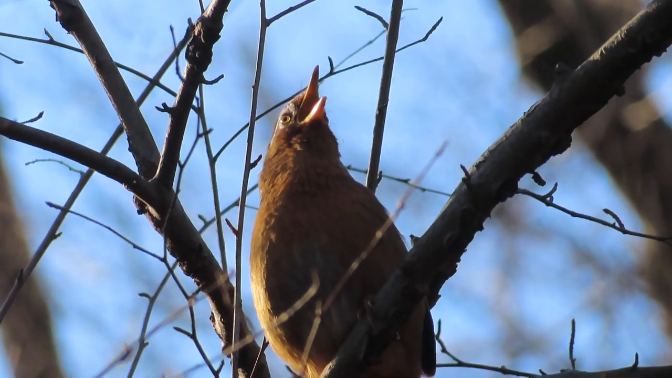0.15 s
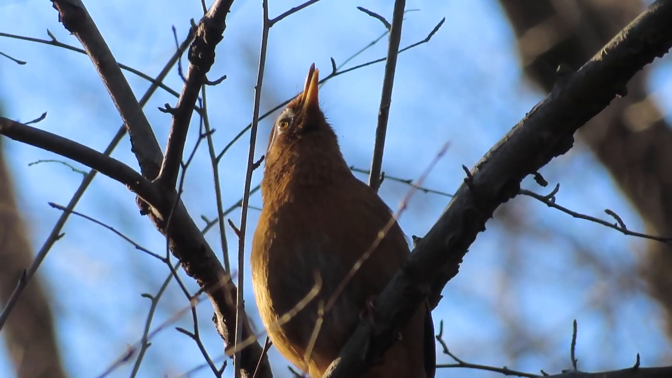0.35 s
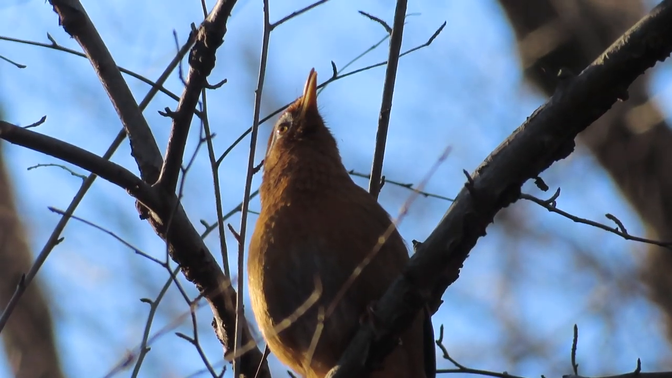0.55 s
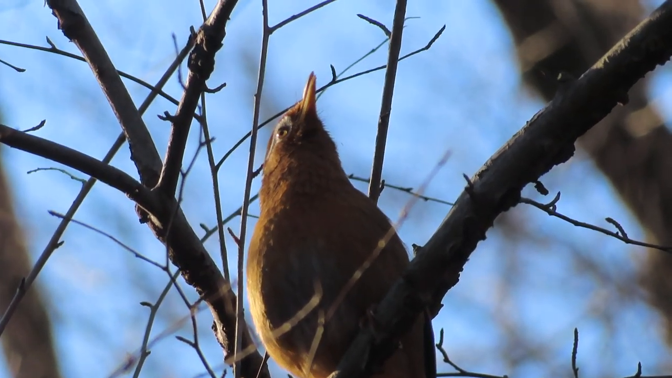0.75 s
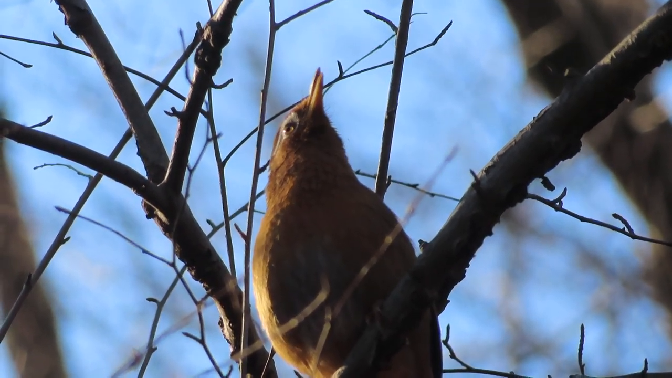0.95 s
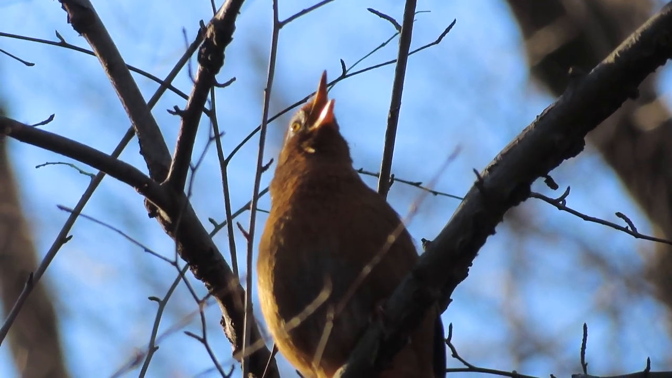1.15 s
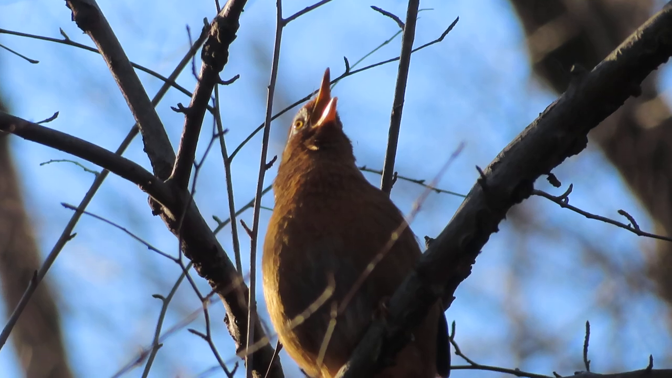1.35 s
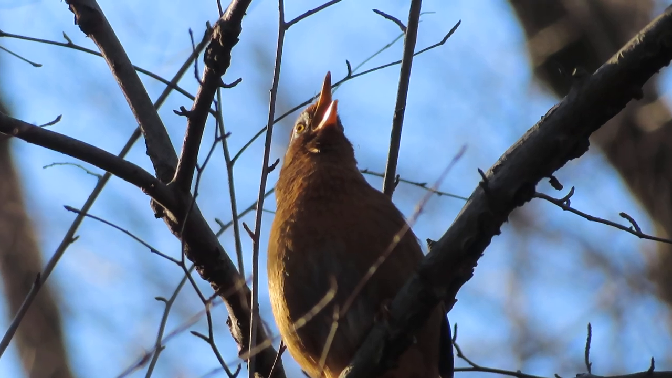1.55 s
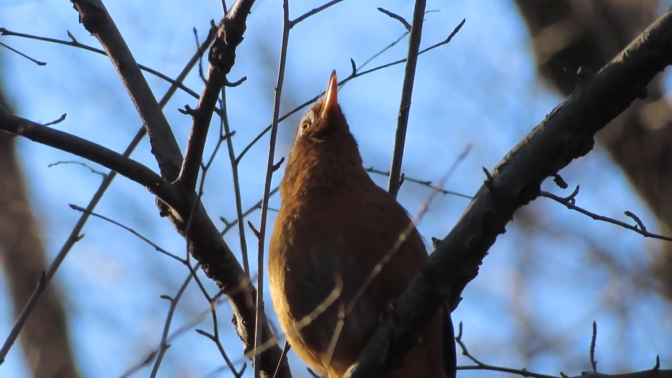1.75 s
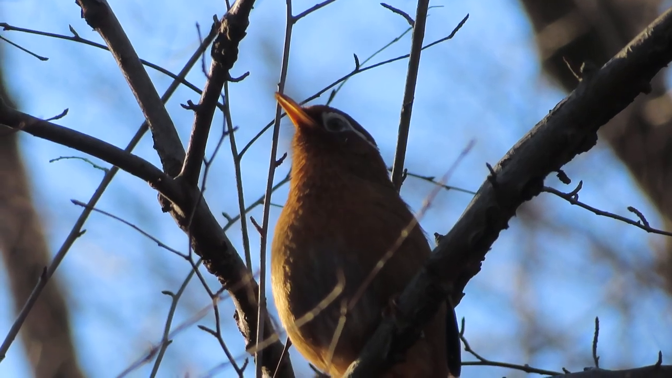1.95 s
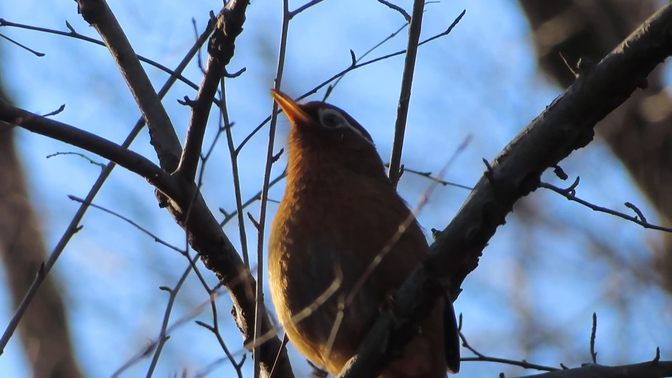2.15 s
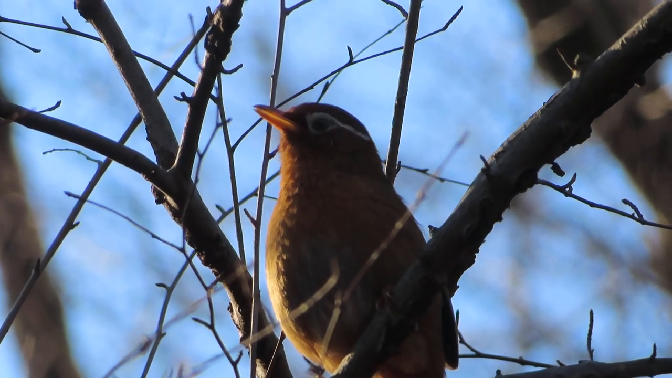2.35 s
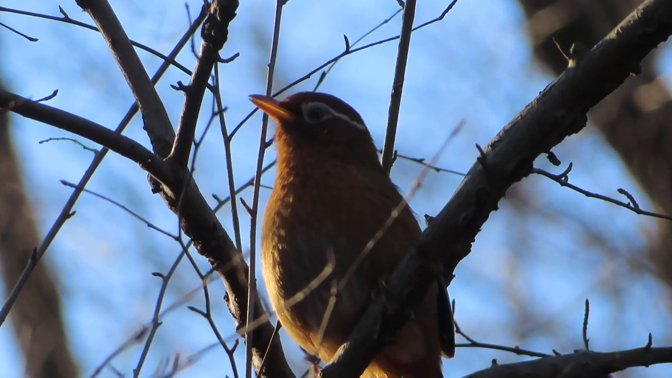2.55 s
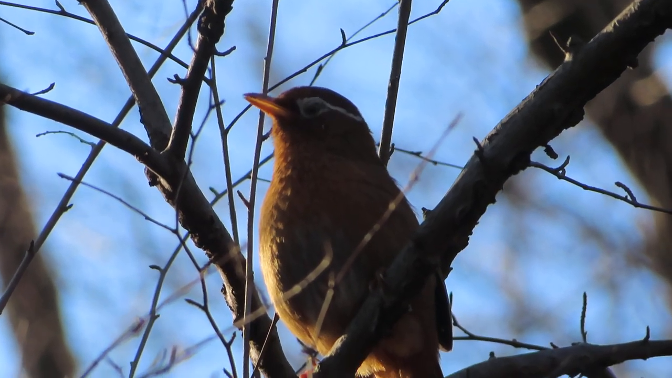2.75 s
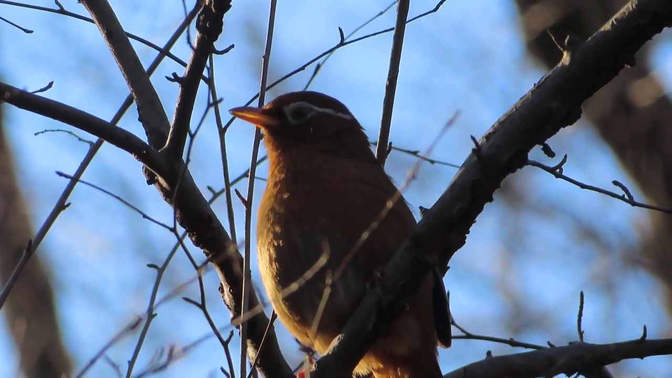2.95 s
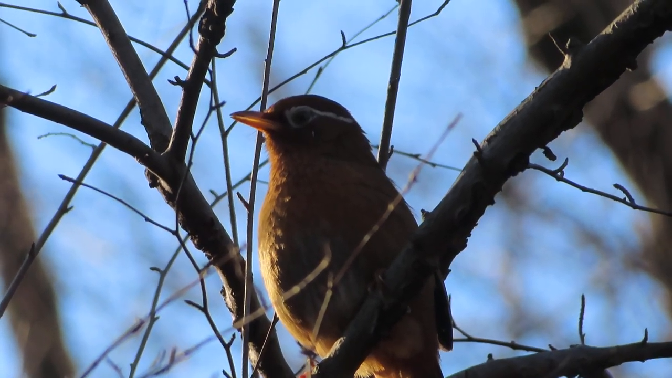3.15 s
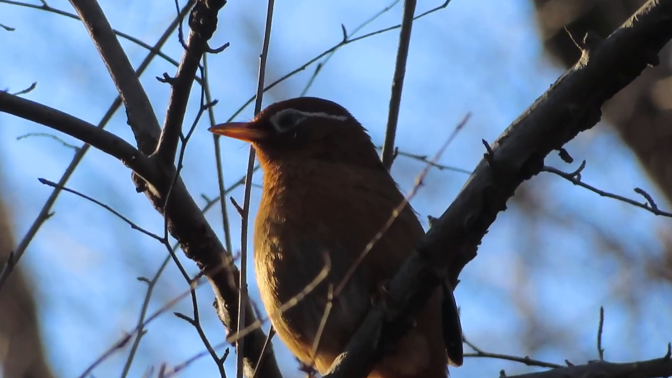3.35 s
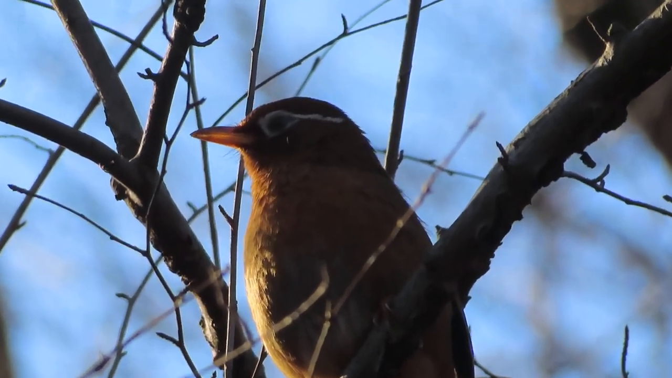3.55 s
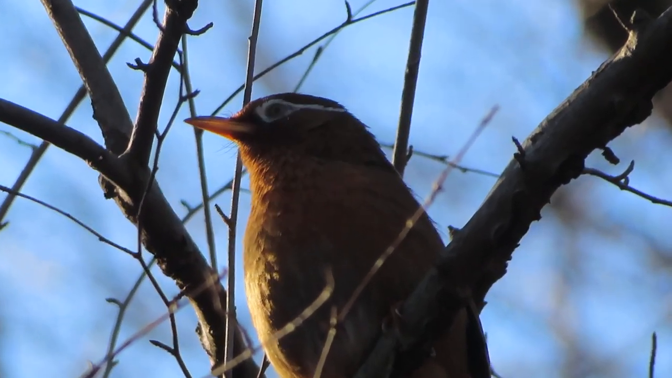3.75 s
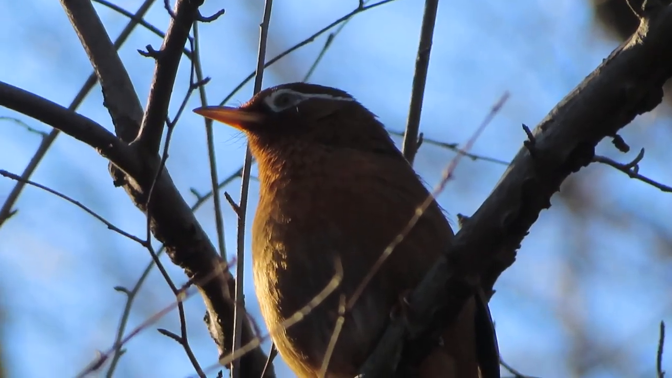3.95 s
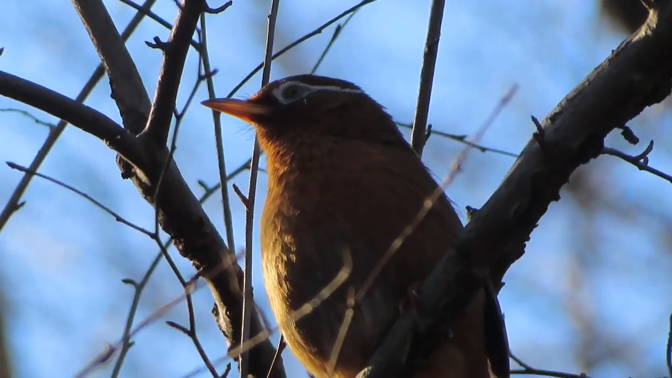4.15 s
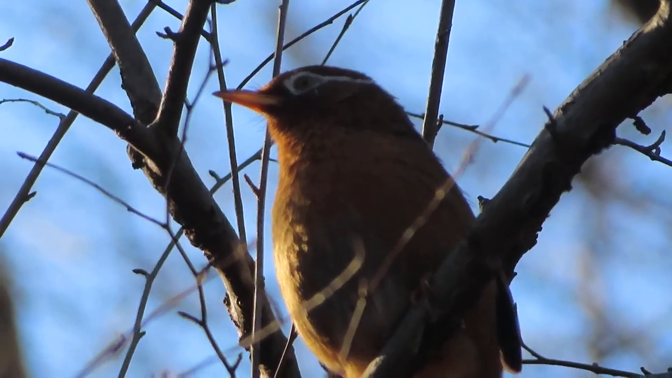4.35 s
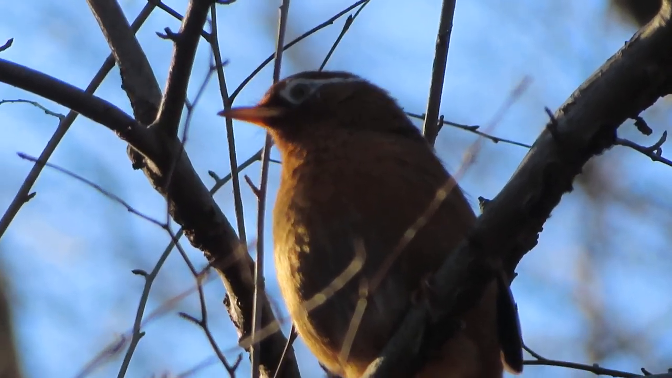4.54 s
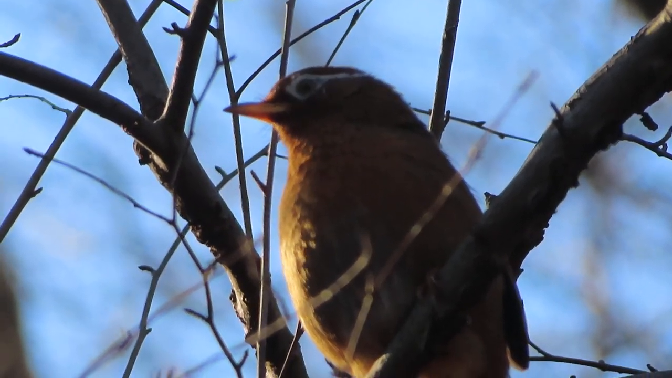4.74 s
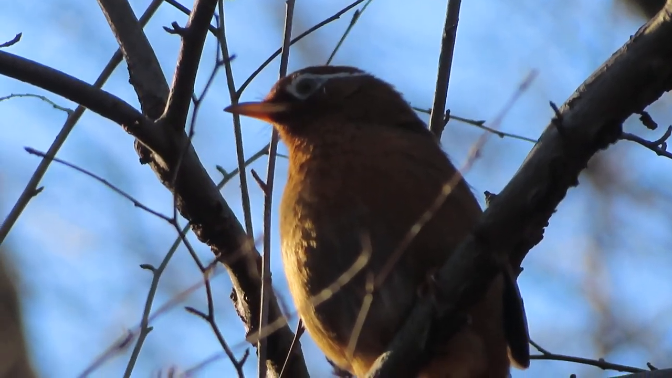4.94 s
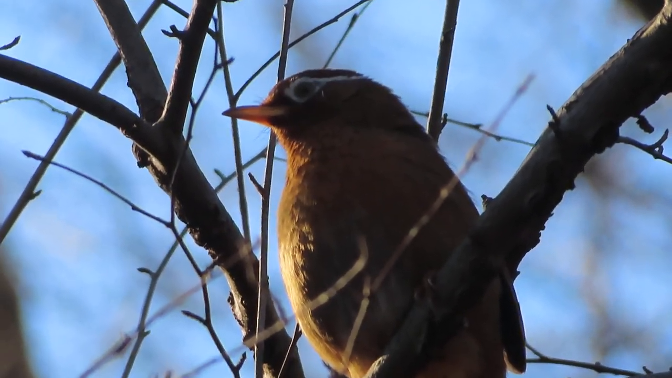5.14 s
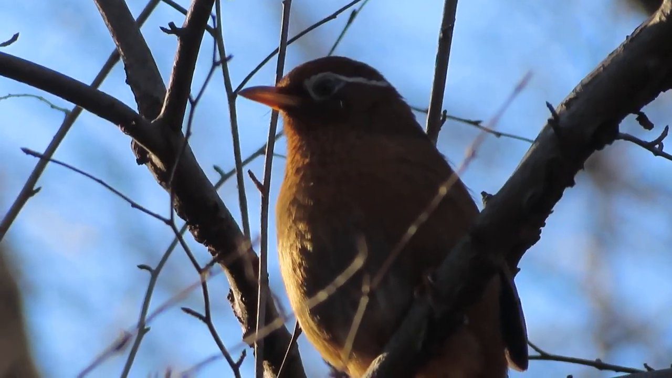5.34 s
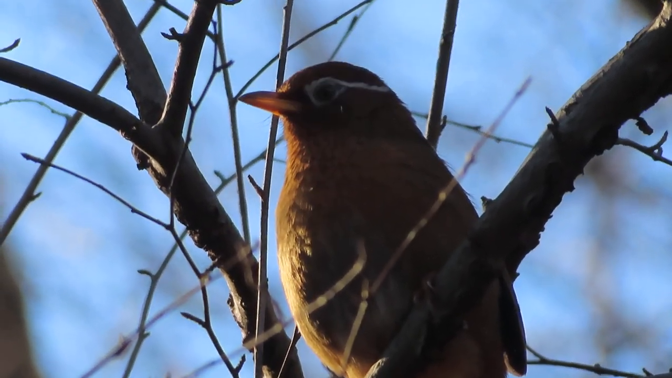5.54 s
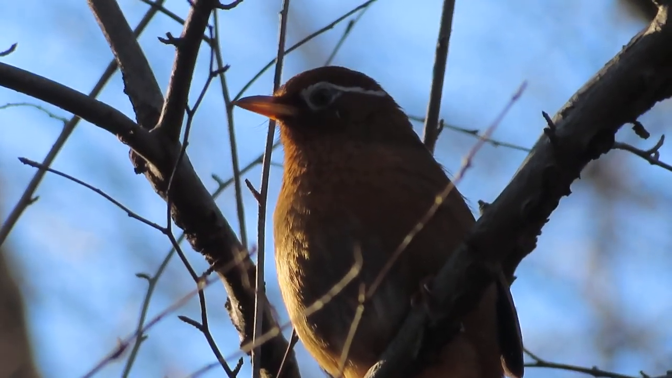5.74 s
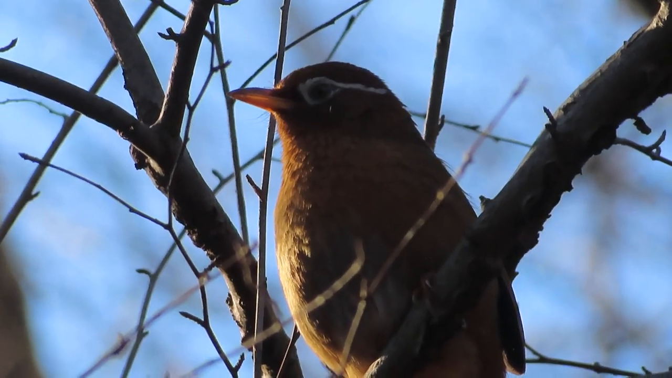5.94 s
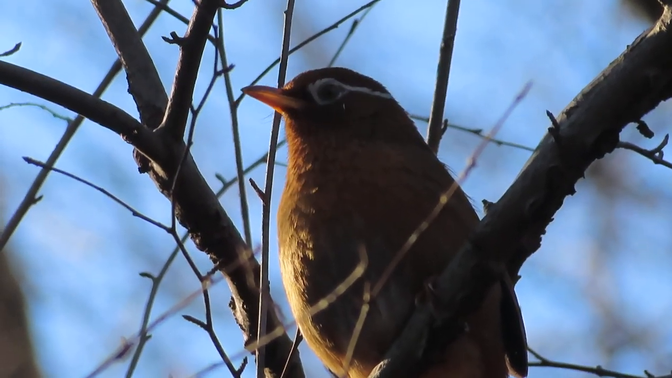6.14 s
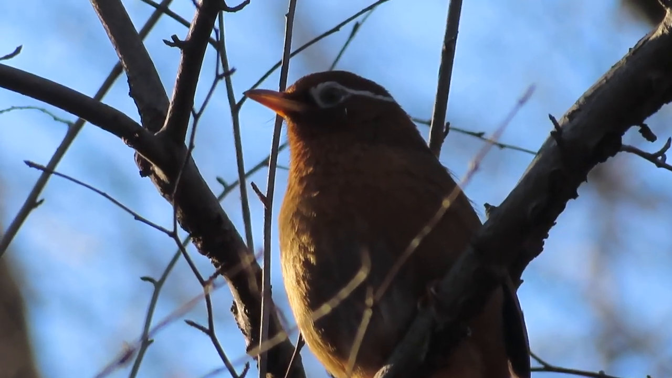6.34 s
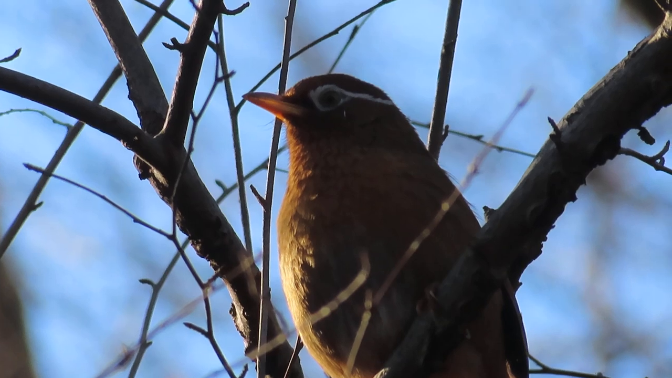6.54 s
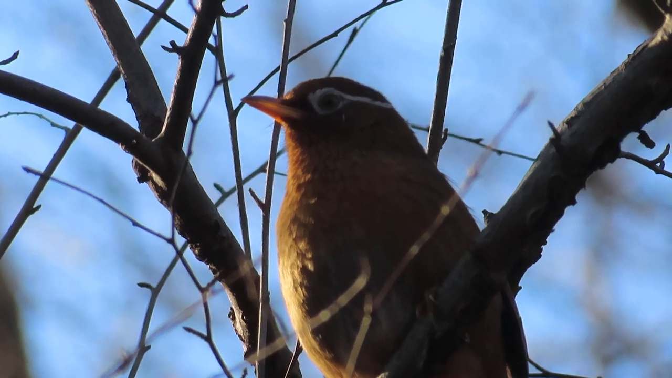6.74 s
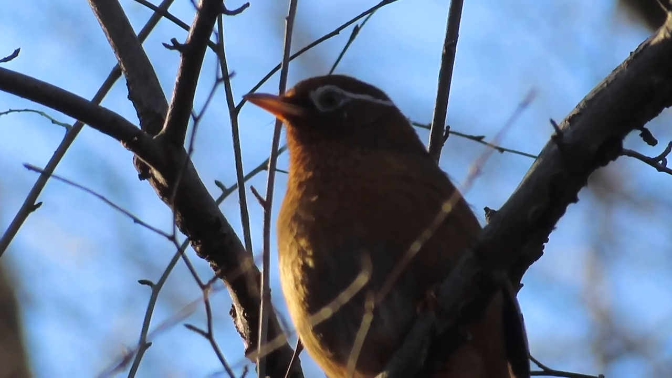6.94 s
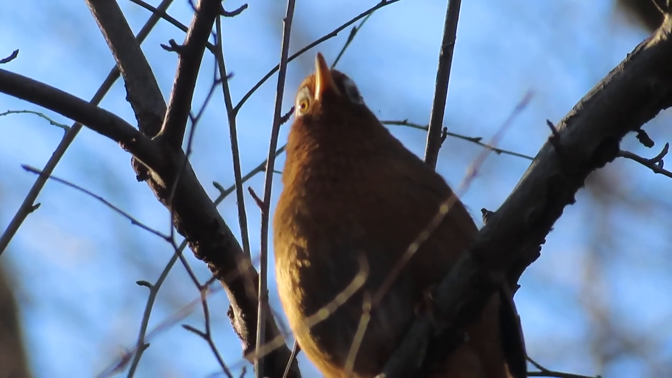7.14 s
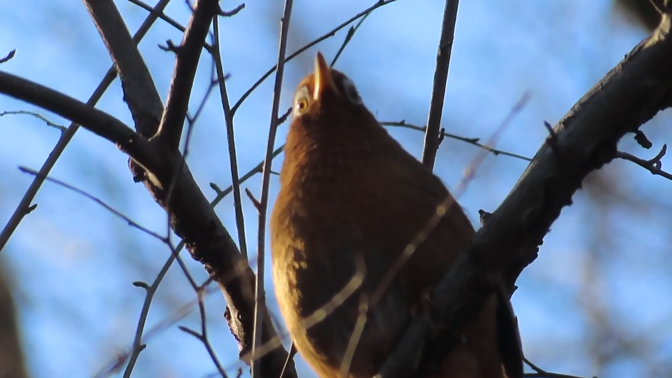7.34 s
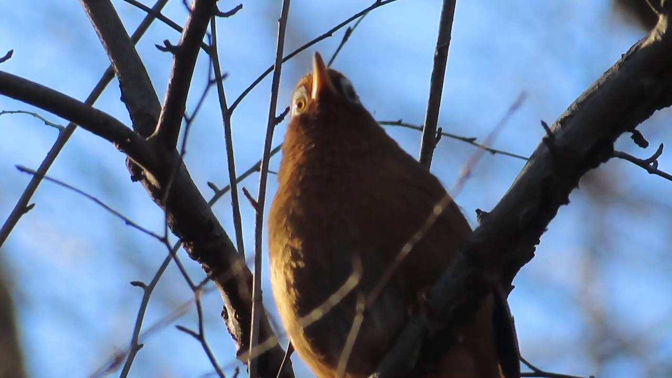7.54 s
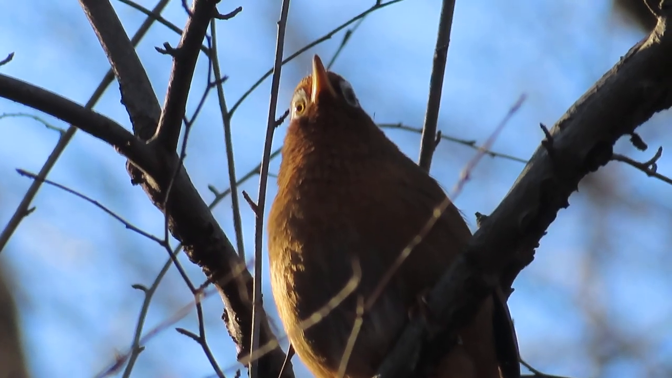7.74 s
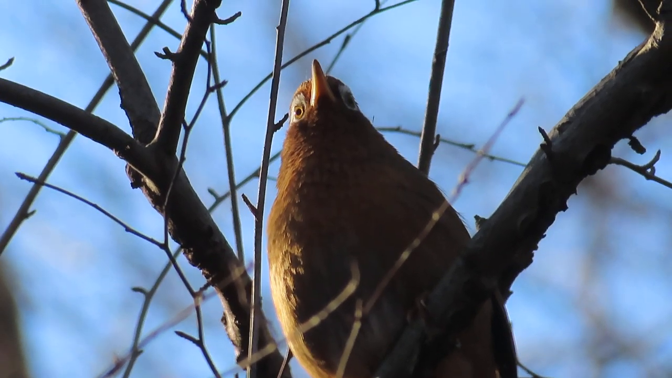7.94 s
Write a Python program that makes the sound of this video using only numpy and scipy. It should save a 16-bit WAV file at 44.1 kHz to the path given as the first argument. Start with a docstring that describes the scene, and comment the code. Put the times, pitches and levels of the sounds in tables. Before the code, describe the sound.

Close birdsong outdoors: two falling buzzes, then rapid whistled and rough notes echoing off trees over a low, faraway traffic hum.

```python
"""A thrush-like songbird on a bare branch ends its phrase with two long, falling buzzes: a gliding tone
with a fast warble in pitch and level. A neighbour carries on with quick whistles and burred notes.
Both voices have weak partials, coloured by the windpipe and lifted by an open beak. An earlier note
still rings in the trees at the start. Farther birds answer faintly, a few dry ticks sound, and trunks
scatter every note back as echoes and a diffuse tail. Underneath, a town hums far away."""
import sys
import numpy as np
from scipy import signal
from scipy.fft import rfft, irfft, next_fast_len
from scipy.io import wavfile
from scipy.ndimage import uniform_filter1d, map_coordinates

SR = 44100
rng = np.random.default_rng(int(sys.argv[2]) if len(sys.argv) > 2 else 0)


def wrap_up_sound(samples):
    """Save the sound to the file named by the first command line argument, as 16-bit audio."""
    columns = np.atleast_2d(samples).T
    # keep every value between -1 and 1, then stretch to whole-number steps
    tamed = np.clip(columns, -1, 1)
    steps = np.round(tamed * 32767).astype(np.int16)
    wavfile.write(sys.argv[1], SR, steps)


N = 356769

# The perched bird's buzz contour: t before the end/s, f/Hz, level/dB
BUZZ_CONTOUR = [(.56, 4550, -49), (.532, 4050, -29), (.5, 3830, -25), (.422, 3600, -22), (.272, 3420, -20),
                (.172, 3365, -20.5), (.072, 3245, -19.5), (.018, 3125, -18.5), (0, 2500, -34)]
# Its cues: end t/s, beak lift of the partials/dB
BUZZ_CUES = [(.342, 1.5), (1.671, 0.9)]
# Partials at the voice organ, per voice: multiple of the fundamental, relative level/dB
BUZZ_PARTIALS = [(.5, -40), (1.5, -43), (2, -25.5), (2.5, -52), (3, -36.5), (4, -41)]
WHISTLE_PARTIALS = [(1.5, -50.5), (2, -31.5), (2.5, -49), (3, -32.5), (3.5, -53), (4, -38.5), (5, -47.5),
                    (6, -52.5)]
BURR_PARTIALS = [(1.5, -44), (2, -29.5), (2.5, -45.5), (3, -32), (4, -41.5), (5, -40.5), (6, -42)]
# The windpipe's notched EQ on those partials, per voice: f/Hz, gain/dB
BUZZ_THROAT = [(1500, -6), (5500, -21.5), (7200, 0), (8500, -4), (10000, -3), (12000, 4), (13300, 6),
               (14300, -8.5), (15500, -30.5)]
WHISTLE_THROAT = [(1500, -1.5), (4500, 1), (5000, -4.5), (5700, -11), (6400, -16), (7000, 2), (8500, 2),
                  (10300, 0.5), (11300, -7), (12800, -3.5), (14200, -0.5), (15500, -31)]
BURR_THROAT = [(1500, -5), (4500, -3), (6000, -9.5), (7000, 0), (8500, -1), (10300, 1), (11300, -4),
               (12500, 4.5), (13600, -1.5), (14500, -23)]

# Shapes of the neighbour's repeated whistles: share of length, pitch height 0-1, relative level/dB
ARCH = [(0, .62, -18), (.1, .68, -4), (.43, .99, -4), (.55, .97, -3), (.8, .56, 0), (.92, .24, -2),
        (1, 0, -30)]
DOUBLE = [(0, 0.56, -7), (.12, 0.76, 1), (.25, 0.816, 2), (.38, 0.85, 0.5), (.43, 0.36, -13),
          (.5, 0.031, -12), (.645, .92, -2.5), (.77, .99, 3), (.9, 0.67, -2.5), (1, .3, -15.5)]
CHIP = [(0, 1, -13), (.13, 0.96, -3.5), (.36, 1, -3.5), (.52, .85, 1), (.88, .38, -7), (1, 0, -26)]
SLIDE = [(0, 0.98, -15), (.04, 0.88, -12), (.12, .94, -5), (.28, .86, -0.5), (.46, .72, -1),
         (.84, .25, -11.5), (1, 0, -32)]
HELD = [(0, 1, -10.5), (.16, 1, -2), (.7, .85, 0.5), (.9, 0.053, -5.5), (1, 0.072, -14)]
DROOP = [(0, 1, -11), (.26, 0.83, 0), (.75, .33, -9), (1, 0.38, -11)]
# Their cues: start t/s, length/s, high f/Hz, low f/Hz, level/dB, beak lift/dB
ARCH_CUES = [(0.059, .22, 3525, 2273, -20.5, 2), (0.827, .256, 3486, 2340, -21, 0.5)]
DOUBLE_CUES = [(2.037, .097, 2480, 2020, -27, -6.5), (2.398, .1, 2464, 1995, -27, -26)]
CHIP_CUES = [(3.733, 0.046, 3020, 2420, -23.5, -4.5), (4.064, 0.037, 2993, 2470, -23.5, -2),
             (4.38, .044, 3020, 2460, -25.5, -2.5)]
SLIDE_CUES = [(6.021, .146, 3004, 1657, -20, -3), (6.714, .132, 3127, 1615, -21, -4)]
HELD_CUES = [(0.324, 0.046, 1890, 1780, -35, -3.5), (5.514, 0.089, 1838, 1650, -37, -11)]
DROOP_CUES = [(6.23, .06, 1803, 1545, -34, -6), (6.918, 0.0564, 1895, 1603, -34, -3)]
# Whistles that step down: start t/s, length/s, hold before the drop/s, high f/Hz, low f/Hz,
# last f/Hz, closing downward flick/Hz, level/dB, beak lift/dB
STEP_CUES = [(3.925, 0.12, 0.0054, 2830, 2404, 2385, 150, -26.5, -3.5),
             (4.25, 0.095, 0.018, 2777, 2468, 2415, 150, -26, -2.5),
             (5.664, .145, 0.0098, 2673, 2362, 2500, 703, -25.5, -3),
             (5.843, 0.14, 0.04, 3010, 2632, 2590, 450, -22, -0.5),
             (6.38, .132, .024, 2575, 2342, 2317, 546, -25.5, -4.5),
             (6.541, 0.13, .03, 2950, 2581, 2550, 448, -22.5, -1)]
# One-off whistles, a contour each: t/s, f/Hz, level/dB
SINGLE_CONTOURS = [
    [(.38, 2110, -42), (.392, 2670, -25), (.42, 2786, -20), (.47, 2840, -21), (.48, 2640, -29.5),
     (.488, 2529, -60)],
    [(.52, 1980, -44), (.532, 1990, -32), (.56, 2127, -26), (.644, 2338, -24.5), (.72, 2324, -20.5),
     (.74, 2140, -34)],
    [(1.322, 2480, -38), (1.342, 2610, -25), (1.357, 2410, -24), (1.373, 2603, -30), (1.386, 2540, -23.5),
     (1.41, 2930, -22), (1.438, 3000, -24), (1.45, 2500, -46)],
    [(1.5, 3500, -38), (1.56, 3283, -24), (1.59, 3043, -22.5), (1.615, 2724, -32), (1.63, 2200, -53)],
    [(3.19, 2070, -55), (3.197, 1984, -39), (3.222, 1980, -31.5), (3.258, 2128, -25.5), (3.28, 1600, -48)],
    [(4.965, 4260, -52), (4.983, 4220, -36), (5.001, 3980, -30.5), (5.111, 3337, -25.5),
     (5.205, 3210, -24.5), (5.229, 3005, -28.5), (5.235, 2860, -41)],
    [(5.315, 3280, -33), (5.335, 3004, -27), (5.365, 2756, -22), (5.419, 2290, -31), (5.439, 1970, -46.5)],
]
# Beak opening for each one-off: lift/dB
SINGLE_BEAKS = [-7.5, -10, 5, -0.5, -19, 3.5, 2.5]
# The neighbour's burred notes, a contour each: t/s, f/Hz, level/dB
BURR_CONTOURS = [
    [(1.885, 2181, -35), (1.907, 2087, -29.5), (1.937, 2326, -28.5)],
    [(2.228, 2326, -33.5), (2.244, 2310, -29), (2.262, 2269, -30), (2.304, 2370, -25), (2.32, 2320, -37.5)],
    [(2.612, 2533, -34.5), (2.642, 2716, -26), (2.692, 3306, -28), (2.764, 3415, -27), (2.796, 3327, -28),
     (2.842, 3070, -26.5)],
    [(2.908, 3293, -31), (2.95, 3166, -24.5), (3.024, 3284, -27), (3.064, 3270, -30), (3.09, 3249, -21),
     (3.104, 3066, -28), (3.121, 2730, -33.5)],
    [(3.29, 2144, -34), (3.306, 2376, -27.5), (3.332, 2422, -25), (3.376, 2250, -24.5),
     (3.422, 2162, -27.5), (3.462, 2180, -29.5)],
    [(3.62, 3644, -51), (3.628, 3290, -32), (3.646, 2820, -24), (3.668, 2510, -28.5), (3.69, 2445, -28.5),
     (3.706, 2200, -42)],
    [(4.575, 1800, -40), (4.601, 1749, -35.5), (4.643, 1931, -30), (4.745, 2130, -27.5),
     (4.845, 2398, -25.5), (4.855, 2366, -30.5)],
]
# The warble on each: first depth/Hz, last depth/Hz, rate/Hz, beak lift/dB
BURR_WARBLES = [(150, 180, 170, -6.5), (171, 180, 156, -9.5), (210, 30, 200, -2.5), (150, 47, 165, -5),
                (80, 170, 150, -6.5), (91, 25, 170, -1.5), (15, 196, 138, -4.5)]

# Row one is the fading ring in the trees of a note sung just before the start; the rest are far birds'
# bent glides: start t/s, length/s, first f/Hz, middle f/Hz, last f/Hz, first level/dB, last level/dB
RING_AND_GLIDES = [(0, 0.16, 2320, 2400, 2390, -31, -64), (0.107, 0.095, 1050, 1080, 1053, -53, -56.5),
                   (0.158, 0.089, 1386, 1300, 1355, -59, -55), (0.628, .05, 1093, 1096, 1070, -60, -53),
                   (0.683, 0.062, 1360, 1346, 1310, -55, -57), (1.147, 0.042, 1075, 1080, 1100, -51, -60),
                   (1.44, 0.31, 5780, 5700, 4800, -61, -75), (2.628, 0.24, 1784, 2375, 2760, -66, -41),
                   (3.13, .23, 1757, 2580, 3050, -58, -42), (4.308, 0.041, 3390, 3600, 3600, -60, -62),
                   (4.479, 0.2, 1820, 2200, 2670, -57, -47), (4.658, 0.13, 3930, 3950, 4100, -60, -64),
                   (4.749, 0.1, 3630, 3850, 3850, -49.5, -61), (5.055, 0.049, 1850, 1750, 1680, -57, -56),
                   (5.11, 0.16, 1800, 2300, 2345, -53, -42.5), (5.922, 0.085, 3410, 3780, 3450, -59, -62),
                   (5.935, 0.047, 3950, 3950, 3500, -63, -64), (6.01, .09, 2730, 2230, 1880, -56, -54),
                   (6.337, 0.053, 2540, 2520, 2570, -49, -43), (6.59, 0.084, 4107, 3900, 3860, -69, -67),
                   (6.595, 0.089, 2410, 2100, 1750, -53, -57),
                   (7.119, 0.14, 3134, 2260, 1880, -44.5, -57.5),
                   (7.386, 0.077, 2075, 2180, 2174, -57, -50.5), (7.514, .07, 2492, 2482, 2450, -44, -42),
                   (7.704, 0.14, 3110, 2290, 1800, -45, -58), (7.792, 0.12, 1338, 1288, 1300, -59, -61.5),
                   (7.848, .07, 4830, 4760, 4600, -69, -70), (8.001, 0.034, 3170, 3500, 3300, -55, -53),
                   (8.034, 0.037, 3110, 3070, 2500, -44.5, -47)]
# A far zigzag chip and a rising call that tips over: share of length, pitch height 0-1, relative level/dB
ZIP = [(0, 1, -8), (.3, 0, -3), (.63, .85, -3.5), (1, 0.14, -9.5)]
HOOK = [(0, 0, -7), (.5, .7, 3), (.72, 0.93, 2), (.82, .97, -1), (1, 0.14, -23)]
# Their cues: start t/s, length/s, high f/Hz, low f/Hz, level/dB, beak lift/dB
ZIP_CUES = [(2.533, .023, 9100, 7500, -54, 0), (7.088, .026, 9000, 7200, -58, 0)]
HOOK_CUES = [(4.51, .095, 4130, 3450, -62, 0), (6.885, 0.087, 4140, 3380, -59.5, 0),
             (7.285, 0.1, 4090, 3520, -60, 0), (7.635, 0.089, 4240, 3280, -57, 0)]
# Small dry ticks: t/s, peak level/dB, f/Hz
TICKS = [(3.192, -50, 5500), (3.523, -58, 8600), (3.539, -61, 8200)]

# Send EQ to the trees; the beak beams the top treble forward, so little reaches them: f/Hz, gain/dB
TREE_SEND_EQ = [(3300, -1), (4200, -2), (5500, -1), (9000, -2), (14000, -24)]
# Single echoes off near trunks: delay/s, level/dB
TRUNK_ECHOES = [(.011, -22), (.024, -14), (.058, -17.5), (.09, -22.5), (.125, -30.5)]
# Reverb time of the wood: f/Hz, T60/s
WOOD_DECAY = [(1500, 1.66), (3000, 1.54), (5000, 2.2), (10000, 0.67)]
# Spectrum of the town's hum: f/Hz, relative density/dB
TOWN_SPECTRUM = [(12, -59), (30, 0), (54, -5.5), (118, -4), (249, -1.5), (420, -8.5), (600, -12),
                 (1050, -14), (1200, -18), (1670, -22.5), (2500, -18), (4000, -27.5), (8000, -35.5),
                 (13000, -45.5), (15700, -69.5)]
# Stereo width of the hum: f/Hz, left-right correlation
TOWN_CORRELATION = [(30, .998), (60, .985), (125, .935), (250, .76), (500, .68), (1000, .7), (4000, .3),
                    (12000, .35)]


def perched_buzzes():
    """The lead bird's falling buzz: its warble gets shallower and a little slower as the pitch sinks."""
    notes = []
    for end, beak_db in BUZZ_CUES:
        contour = []
        for before, hz, db in sorted(BUZZ_CONTOUR, reverse=True):
            depth_hz = min(0.17 * (hz - 2070), 300)
            rate_hz = 102 + 4.9 * hz / 1000
            contour.append((end - before, hz, db, depth_hz, rate_hz))
        notes.append((contour, beak_db))
    return sing(notes, BUZZ_PARTIALS, BUZZ_THROAT, jitter_hz=22, shimmer_db=-0.7, rasp_db=1.24,
                peaked=0.35, skew=0.63, db_per_100hz=-1, uneven=.045)


def sing(notes, partials=(), throat=(), *, jitter_hz, shimmer_db, rasp_db=0,
         peaked=0, skew=0, db_per_100hz=0, uneven=0):
    """The voice organ: a gliding sine with weak partials; a warble swings pitch and level together."""
    out = np.zeros(N + SR)
    for contour, beak_db in notes:
        times, hz, db, *warble = np.transpose(contour)
        start = max(round(times[0] * SR), 0)
        t = np.arange(start, round(times[-1] * SR)) / SR
        n = len(t)
        # Muscles round every corner of the glide.
        glide = uniform_filter1d(np.interp(t, times, hz), size=SR // 120, mode="nearest")
        envelope_db = np.interp(t, times, db)
        level_db = envelope_db + shimmer_db * wobble(120, n) + rasp_db * wobble(900, n)
        pitch = glide + jitter_hz * wobble(259.4, n)
        if warble:
            depth_hz, rate_hz = (np.interp(t, times, column) for column in warble)
            rate_hz *= 1 + uneven * wobble(59.86, n)
            turn = 2 * np.pi * (np.cumsum(rate_hz) / SR + rng.random())
            depth_hz *= 1 + 2 * uneven * wobble(90, n)  # no two warbles alike
            swing = depth_hz * (np.cos(turn) + peaked * np.cos(2 * turn + skew))  # sharp tops
            pitch += swing
            level_db += db_per_100hz * swing / 100
        phase = 2 * np.pi * np.cumsum(pitch) / SR
        # High notes alternate strong and weak cycles, which raises the half-integer partials.
        half_db = np.clip((glide - 3100) * 0.043, -20, 8)
        effort_db = 0.13 * (envelope_db - db.max() + 7.5)  # softer singing is purer
        tone = np.sin(phase)
        for k, partial_db in partials:
            colour_db = along(throat, k * pitch) + beak_db + effort_db + half_db * (k % 1 > 0)
            flicker_db = 1.74 * wobble(300, n)
            tone += amp(partial_db + colour_db + flicker_db) * (k * pitch < SR / 2) * np.sin(k * phase)
        fade = np.clip(np.minimum(t - times[0] + (start == 0), times[-1] - t) / 0.0017, 0, 1)
        out[start:start + n] += np.sqrt(2) * amp(level_db) * fade * tone
    return out[:N]


def neighbour_whistles():
    """The second bird's clear notes, with no warble: steps, repeated shapes and one-offs."""
    notes = [step_note(*cue) for cue in STEP_CUES]
    for shape, cues in [(ARCH, ARCH_CUES), (DOUBLE, DOUBLE_CUES), (CHIP, CHIP_CUES),
                        (SLIDE, SLIDE_CUES), (HELD, HELD_CUES), (DROOP, DROOP_CUES)]:
        notes += stretched(shape, cues)
    notes += zip(SINGLE_CONTOURS, SINGLE_BEAKS)
    return sing(notes, WHISTLE_PARTIALS, WHISTLE_THROAT, jitter_hz=13.2, shimmer_db=1.35, rasp_db=0.35)


def step_note(start, length, hold, high, low, last, flick_hz, db, beak_db):
    """A whistle that holds, drops to a lower pitch and flicks down as it dies."""
    attack_s, flick_s, drop_s = 0.022, 0.0136, 0.32 * length
    drop_at, end = start + hold, start + length
    pitch = [(start, high), (drop_at, high), (drop_at + drop_s, low),
             (end - flick_s, last), (end, last - flick_hz)]
    level = [(start, db - 10), (start + attack_s, db), (end - flick_s, db), (end, db - 23.5)]
    return merged(pitch, level), beak_db


def neighbour_burrs():
    """The second bird's rough notes: a very fast warble whose depth grows or dies exponentially."""
    notes = []
    for points, (first_depth, last_depth, rate_hz, beak_db) in zip(BURR_CONTOURS, BURR_WARBLES):
        times, hz, db = np.transpose(points)
        progress = (times - times[0]) / (times[-1] - times[0])
        depth_hz = first_depth * (last_depth / first_depth) ** progress
        notes.append(([(*point, rate_hz) for point in zip(times, hz, db, depth_hz)], beak_db))
    return sing(notes, BURR_PARTIALS, BURR_THROAT, jitter_hz=27.7, shimmer_db=1.5, rasp_db=0.5,
                peaked=0.073, db_per_100hz=-0.5, uneven=.14)


def ring_and_far_birds(fade_s=0.0076, fade_db=-4):
    """Plain tones: an earlier note's fading ring in the trees, then far birds' glides, chips and hooks."""
    notes = []
    for start, length, first_hz, middle_hz, last_hz, first_db, last_db in RING_AND_GLIDES:
        end = start + length
        pitch = [(start, first_hz), (start + length / 2, middle_hz), (end, last_hz)]
        level = [(start, first_db + fade_db), (start + fade_s, first_db),
                 (end - fade_s, last_db), (end, last_db + fade_db)]
        notes.append((merged(pitch, level), 0))
    notes += stretched(ZIP, ZIP_CUES) + stretched(HOOK, HOOK_CUES)
    return sing(notes, jitter_hz=24, shimmer_db=2.5)


def ticks(t60_s=.005):
    """Tiny dry clicks: a high ping with a little noise, damped at once."""
    t = np.arange(SR // 50) / SR
    out = np.zeros(N)
    for start, db, hz in TICKS:
        ping = np.sin(2 * np.pi * hz * t) + .25 * rng.standard_normal(len(t))
        out[round(start * SR):][:len(t)] += amp(db - 60 * t / t60_s) * ping
    return out


def trunk_echoes(send):
    """Slapback: a few near trunks each return one copy, from alternate sides."""
    return sum(amp(db) * pan(1.5 * (-1) ** k) * np.pad(send, (round(delay * SR), 0))[:N]
               for k, (delay, db) in enumerate(TRUNK_ECHOES))


def wood_reverb(send, correlation=0.96, onset_s=0.0043):
    """The wood's diffuse answer: decaying noise, with a new tail for every third of a second."""
    out, hop = np.zeros((2, N + 3 * SR)), SR // 3
    crossfade = np.hanning(2 * hop + 1)[:-1]
    send = np.pad(send, (hop, 2 * hop))
    width = np.arccos(correlation) / 2
    for at in range(0, N + hop, hop):
        hz, t, noise = signal.stft(rng.standard_normal((2, 3 * SR // 4)), SR, nperseg=256)
        decay_db = -60 * t / along(WOOD_DECAY, hz)[:, None]
        early_db = 2.77 * (t < .165)  # the ring of near trees answers more strongly
        envelope = amp(decay_db + early_db) * (1 - np.exp(-t / onset_s))
        mid, side = signal.istft(noise * envelope, SR, nperseg=256)[1]
        tail = left_right(np.cos(width) * mid, np.sin(width) * side) / np.linalg.norm(mid)
        wet = signal.fftconvolve((send[at:at + 2 * hop] * crossfade)[None], tail, axes=1)
        out[:, at:at + wet.shape[1]] += wet
    return out[:, hop:hop + N]


def town_hum(level_db=-45):
    """The bed of distant traffic and air: steady noise, slightly patchy, near mono in the bass."""
    def mid_side_eq(hz):
        width = np.arccos(along(TOWN_CORRELATION, hz)) / 2
        return amp(along(TOWN_SPECTRUM, hz)) * [np.cos(width), np.sin(width)]

    noise = signal.stft(rng.standard_normal((2, N)), nperseg=512)[2]
    patches = uniform_filter1d(rng.standard_normal(noise.shape[1:]), size=6, axis=0)  # across frequency
    patches = uniform_filter1d(patches, size=14, axis=1)  # across time
    patchy = signal.istft(noise * amp(0.5 * unit(patches)), nperseg=512)[1][:, :N]
    hum = unit(left_right(*filtered(patchy, mid_side_eq)))
    return amp(level_db + 0.062 * wobble(0.99, N)) * hum


def stretched(shape, cues):
    """One note per cue: the shape stretched to its length and pitch range."""
    return [([(start + share * length, low + height * (high - low), db + relative_db)
              for share, height, relative_db in shape], beak_db)
            for start, length, high, low, db, beak_db in cues]


def merged(pitch, level):
    """Pitch and level breakpoints as one contour: t/s, f/Hz, level/dB."""
    times = np.unique([point[0] for point in pitch + level])
    hz, db = (np.interp(times, *np.transpose(curve)) for curve in (pitch, level))
    return np.transpose([times, hz, db])


def amp(db):
    """Decibels to gain."""
    return 10 ** (np.asarray(db) / 20)


def pan(left_db):
    """Stereo gains: left up and right down by this much."""
    return amp([[left_db], [-left_db]])


def left_right(mid, side):
    """Mid and side to stereo."""
    return np.array([mid + side, mid - side])


def unit(x):
    """Scaled to rms 1."""
    return x / np.sqrt(np.mean(x ** 2) + 1e-20)


def along(points, hz):
    """A breakpoint curve read on a log frequency axis."""
    freqs, values = np.transpose(points)
    return np.interp(np.log(np.abs(hz) + 1), np.log(freqs + 1), values)


def wobble(rate, size):
    """Smooth random modulation, rate knots a second."""
    knots = rng.standard_normal(int(size * rate / SR + 4))
    return map_coordinates(knots, [np.arange(size) * rate / SR])


def filtered(x, response):
    """x through a frequency response."""
    size = next_fast_len(N + SR // 2)
    return irfft(rfft(x, size) * response(np.fft.rfftfreq(size, 1 / SR)), size)[..., :N]


def scene():
    """The perched bird is straight ahead, the neighbour a little left, the far birds fainter, wetter."""
    perched = perched_buzzes()
    neighbour = neighbour_whistles() + neighbour_burrs()
    faint = ring_and_far_birds()
    lead_s = np.array([[6e-6], [-6e-6]])  # the neighbour arrives on the left first
    left_first = filtered(neighbour, lambda hz: np.exp(2j * np.pi * hz * lead_s))
    direct = perched * pan(-.15) + left_first * pan(.55) + faint * pan(-.4)
    near_send = filtered(amp(-6.5) * perched + neighbour, lambda hz: amp(along(TREE_SEND_EQ, hz)))
    send = near_send + amp(5.5) * faint
    return direct + trunk_echoes(send) + amp(-11.5) * wood_reverb(send) + town_hum() + ticks()


def record(dry, top_hz=15700):
    """A brick-wall low-pass on the whole mix."""
    return filtered(dry, lambda hz: hz < top_hz)


dry = scene()
out = record(dry)
wrap_up_sound(out)
```